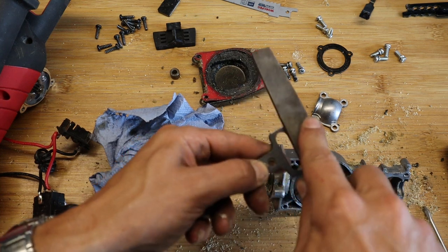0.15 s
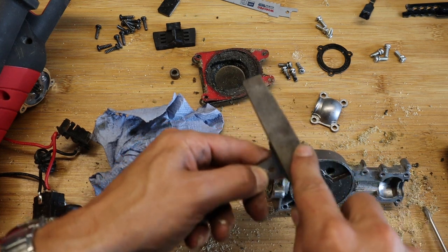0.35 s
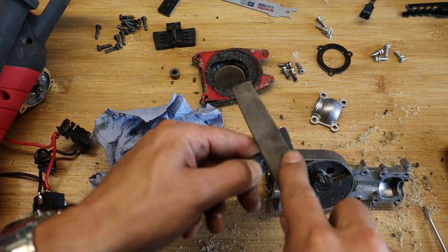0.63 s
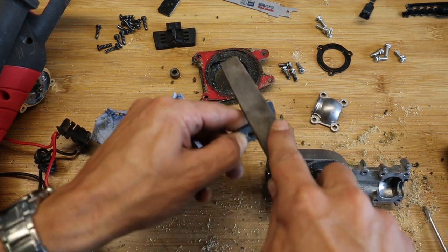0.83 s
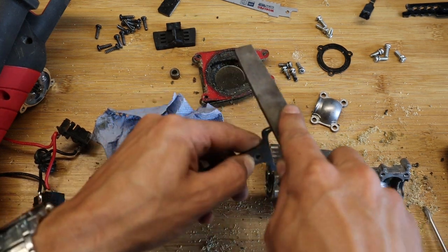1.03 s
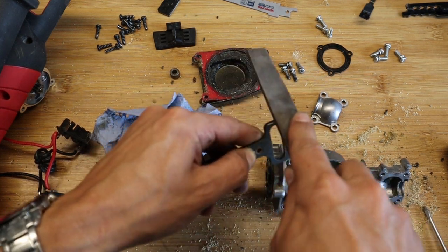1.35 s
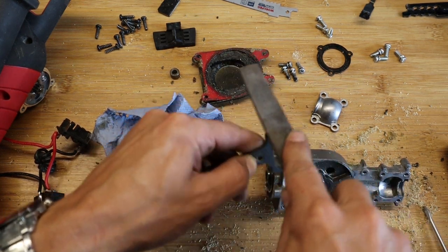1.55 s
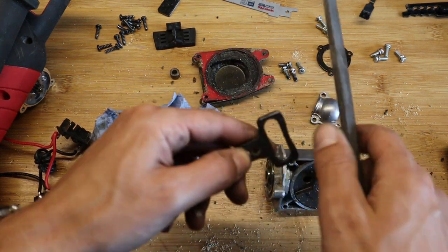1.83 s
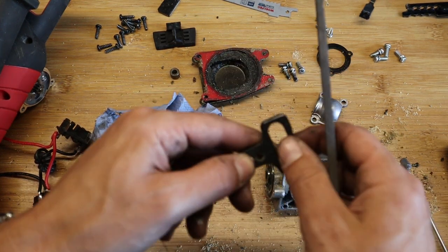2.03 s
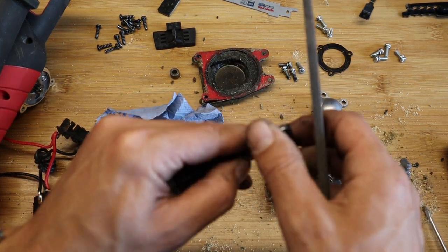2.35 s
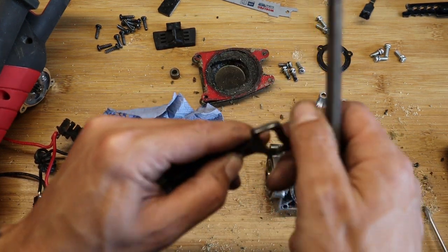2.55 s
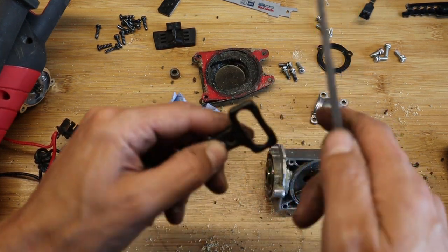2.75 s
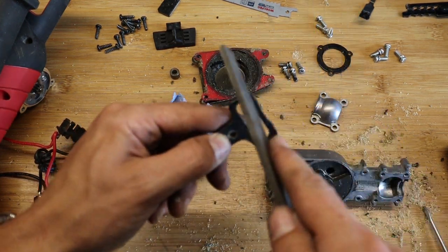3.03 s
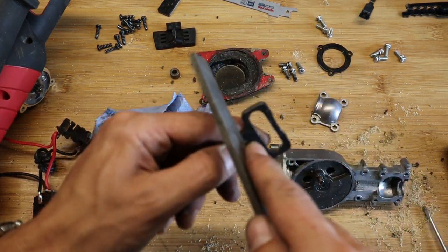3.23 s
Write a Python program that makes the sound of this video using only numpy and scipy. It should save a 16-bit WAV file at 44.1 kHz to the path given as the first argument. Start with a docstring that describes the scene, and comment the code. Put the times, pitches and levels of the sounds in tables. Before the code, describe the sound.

A hand file rasps in quick short strokes across a small part, then pauses.

```python
"""Filing at a workbench

A flat hand file is pushed and drawn back in quick strokes over a small part held above a wooden bench. Its
teeth catch at a rate that follows the hand's speed and tear off chips; these impulses excite the resonances of
file and part in a small room. The file clicks as it bites in at the start of some strokes, the part is turned
in the fingers, and the file is set down again with a light scrape."""
import sys
import numpy as np
from scipy import signal
from scipy.fft import rfft, irfft
from scipy.io import wavfile

SR = 44100
rng = np.random.default_rng(int(sys.argv[2]) if len(sys.argv) > 2 else 0)


def generate_wav(sig):
    """Save sig (samples, or channels by samples) to the path in sys.argv[1] as 16-bit PCM at SR."""
    pcm = np.round(np.clip(np.atleast_2d(sig).T, -1, 1) * 32767).astype(np.int16)
    wavfile.write(sys.argv[1], SR, pcm)


N = 149940
HZ = np.fft.rfftfreq(4096, 1 / SR)  # frequency axis of the gain curves


def amp(db):
    """Amplitude ratio of a level in decibels."""
    return 10 ** (np.asarray(db) / 20)


def unit(x):
    """Normalisation to an rms of 1."""
    return x / np.sqrt(np.mean(x ** 2) + 1e-20)


def read(points, hz):
    """Interpolation of a table on a logarithmic frequency axis."""
    f, value = np.transpose(points)
    return np.interp(np.log(hz + 1), np.log(f + 1), value)


def add(mix, start_s, sound):
    """Superposition of a sound on the mix."""
    at = round(start_s * SR)
    sound = sound[max(-at, 0):]
    part = mix[max(at, 0):][:len(sound)]
    part += sound[:len(part)]


def wander(count, hz):
    """Random fluctuation: low-passed noise with an rms near 1."""
    f = np.fft.rfftfreq(SR, 1 / SR)
    return unit(irfft(rfft(rng.standard_normal(SR)) / (1 + (f / hz) ** 2) ** 2))[:count]


def shelf(hz):
    """High-pass curve rising from 0 to 1 around hz."""
    return 1 / (1 + (hz / (HZ + 1)) ** 6)


def peak(hz, width):
    """Lorentzian resonance curve of height 1."""
    return 1 / (1 + (2 * (HZ - hz) / width) ** 2)


def colour(x, db, dispersion_s=.002):
    """Unit-energy filter of shape db, with dispersion: low bending waves arrive after high ones."""
    log_gain = np.log(amp(np.concatenate([db, db[-2:0:-1]])))
    minimum_phase = np.exp(np.conj(signal.hilbert(log_gain)))[:len(HZ)]
    group_delay = dispersion_s * (1 - np.sqrt(HZ / HZ[-1]))
    impulse = irfft(minimum_phase * np.exp(-2j * np.pi * np.cumsum(group_delay) * HZ[1]))
    return signal.fftconvolve(x, impulse / np.linalg.norm(impulse))


def room_tone(level_db=-56):
    """Stationary background noise: faint hiss and rumble."""
    # Each row: frequency in Hz, relative spectral density in dB.
    spectrum = [(20, -9), (50, -7), (120, -7.5), (300, -10), (650, -14), (1150, -7.5), (1500, -13.5),
                (1900, -18.5), (5000, -20.5), (16000, -24)]
    gain = amp(read(spectrum, np.fft.rfftfreq(N, 1 / SR)))
    return amp(level_db) * unit(irfft(rfft(rng.standard_normal(N)) * gain, N))


def room(x, early_db=-9, early_decay_s=.004019, tail_db=-14, tail_delay_s=.0093):
    """Early reflections off bench and hands, then reverberation that dies faster in the treble."""
    # Each row: frequency in Hz, time to decay by 60 dB in seconds.
    t60 = [(200, 0.42), (800, 0.4), (2100, 0.349), (5500, 0.361), (9000, 0.3255), (15000, 0.2366)]
    t = np.arange(SR // 2) / SR
    reflections = rng.choice([-1., 1.], len(t)) * (rng.random(len(t)) < 4000 / SR)
    early = reflections * (t > .0007) * np.exp(-t / early_decay_s)
    hz, age, bands = signal.stft(reflections * (t > tail_delay_s), SR, nperseg=256)
    tail = signal.istft(bands * amp(-60 * age / read(t60, hz)[:, None]), SR, nperseg=256)[1][:len(t)]
    echoes = amp(early_db) * early / np.linalg.norm(early) + amp(tail_db) * tail / np.linalg.norm(tail)
    return x + signal.fftconvolve(x, echoes)[:N]


def swell(length, db, tone_db):
    """Filtered noise under a half-sine envelope."""
    count = round(length * SR)
    envelope = np.sin(np.linspace(0, np.pi, count))
    return amp(db) * colour(rng.standard_normal(count) * envelope, tone_db)


def handling():
    """Structure-borne bumps of the hands on the bench, and friction noise of fingers on the part."""
    # Each row: start in seconds, length in seconds, level in dB, centre frequency in Hz.
    bumps = [(.36, 0.093, -50.5, 240), (.905, 0.027, -54.5, 169), (1.22, .24, -48.5, 152.1),
             (1.381, .08, -62, 90.17), (2.78, 0.0647, -54.5, 170.3), (2.83, 0.095, -59, 198.8)]
    # Each row: start in seconds, length in seconds, level in dB.
    rubs = [(0.909, 0.0169, -52), (2.552, 0.0488, -50.5), (2.585, .12, -55), (2.802, 0.019, -70.5)]
    # Each row: frequency in Hz, relative spectral density in dB.
    rub_tone = [(100, -31.5), (600, -2.5), (1500, -5.5), (3000, -10.5), (7000, -7), (16000, -20)]
    out = np.zeros(N)
    for start, length, db, hz in bumps:
        add(out, start, swell(length, db, 20 * np.log10(peak(hz, width=.66 * hz) + 1e-5)))
    for start, length, db in rubs:
        add(out, start, swell(length, db, read(rub_tone, HZ)))
    return out


def body_db():
    """The normal modes of file and part, summed in power into one gain curve in dB."""
    # Each row: frequency in Hz, bandwidth in Hz, relative strength in dB.
    modes = [(340, 35, 4.5), (594.1, 90, 8), (976, 71, 8), (1331, 140, 9.5), (1738.7, 180, 6),
             (2214, 50, 7), (2436.5, 160, 5), (2789.7, 35, 4.5), (3056, 88, 5), (4364, 63, 2),
             (3969, 160, 0.5), (4790, 130, 4), (6064, 82, 3.5), (6512, 140, 7), (8453, 290, 8.5)]
    return 10 * np.log10(1 + .6 * sum(amp(db) ** 2 * peak(hz, width) for hz, width, db in modes))


def taps(decay_s=.0024):
    """Impact excitation: the file knocks on the part, and a brief rattle rings their modes."""
    # Each row: start in seconds, level in dB, bass gain in dB.
    knocks = [(.7812, -15, -6.5), (0.788, -13, -4.5), (0.8149, -20, 3.5), (1.008, -16.5, -4.5),
              (1.1765, -25.5, -0.5), (1.374, -13, 1), (1.5055, -21, -6.5), (1.6518, -12, -6),
              (2.571, -49.5, 1), (3.1334, -16, 5), (3.136, -21.5, 4), (3.230, -26, 5.5), (3.2384, -19.5, 3)]
    # Each row: frequency in Hz, relative spectral density in dB.
    tone = [(100, -42.5), (200, -15.5), (350, -6), (700, -12), (1000, -5.5), (1250, -14.5), (1800, 0.5),
            (2500, -4), (4000, 3), (7500, -6), (9000, -9.5), (11000, -17), (16000, -21.5)]
    out, t = np.zeros(N), np.arange(0, .03, 1 / SR)
    for start, db, bass_db in knocks:
        rattle = rng.standard_normal(len(t)) * np.exp(-t / decay_s)
        shape_db = read(tone, HZ) + body_db() + bass_db * (1 - shelf(hz=2200))
        add(out, start, amp(db) * colour(rattle, shape_db))
    return out


def sliding(drive, arch, tooth_rate, place, whine_width=.1406, dull_hz=5300, node_hz=189.66):
    """A moving point of excitation: bands fade as the contact crosses the file's vibration nodes."""
    hz, times, bands = signal.stft(drive, SR, nperseg=512, noverlap=384)
    at, hz = np.minimum((times * SR).astype(int), len(drive) - 1), hz[:, None]
    ratio = hz / tooth_rate[at]
    # Energy gathers at the tooth rate and is thin below it.
    whine_db = 2.5 / (1 + ((ratio - 1) / whine_width) ** 2) - 2.5 / (1 + (ratio / .767) ** 6)
    dull_db = -4 * (1 - arch[at]) * hz ** 4 / (hz ** 4 + dull_hz ** 4)  # treble sinks as the file slows
    nodes_db = 2 * np.cos(2 * np.pi * (np.sqrt(hz / node_hz) * place[at] + rng.random()))
    bands = bands * amp(whine_db + dull_db + nodes_db)
    return signal.istft(bands, SR, nperseg=512, noverlap=384)[1][:len(drive)]


def stroke(tone, direction, length, crest, db, start_db, end_db, tooth_hz,
           bass_db, treble_db, fizz_db, low_hz, low_db, high_hz, high_db):
    """Forced vibration: teeth catch in turn and shed chips as the hand speeds up, presses and slows."""
    attack_s, release_s = .0015, .0027
    end_speed, tooth_jitter, chips_per_s = .45, .12, 5000
    t = np.arange(0, length + 6 * release_s, 1 / SR)
    n, knots = len(t), [0, crest * length, length]
    arch = np.sin(np.interp(t, knots, [0, np.pi / 2, np.pi]))
    tooth_rate = tooth_hz * (end_speed + (1 - end_speed) * arch)
    teeth_passed = np.cumsum(tooth_rate * (1 + tooth_jitter * wander(n, hz=695.04))) / SR
    teeth = np.diff(np.floor(teeth_passed), prepend=0) * amp(3.5 * np.clip(rng.standard_normal(n), -2, 2))
    chips = (rng.random(n) < chips_per_s / SR) * rng.choice([-1, 1], n)
    chips = chips * amp(2.5 * np.minimum(rng.exponential(1, n), 3))
    hiss = amp(-2.5) * rng.standard_normal(n)
    drive = unit(teeth - teeth.mean()) + amp(-2) * unit(chips) + hiss
    place = 1 + direction * .1 * (teeth_passed / teeth_passed[-1] - .5)  # relative contact position
    drive = unit(sliding(drive, arch, tooth_rate, place))
    chatter = unit(amp(2 * wander(n, hz=260)))
    pressure = amp(db + np.interp(t, knots, [start_db, 0, end_db])) * chatter
    contact = np.minimum(t / attack_s, 1) * np.exp(-np.maximum(t - length, 0) / release_s)
    tilt = bass_db * (1 - shelf(hz=890)) + treble_db * shelf(hz=5920) + fizz_db * shelf(hz=10170)
    grip = low_db * peak(low_hz, width=.42 * low_hz) + high_db * peak(high_hz, width=.21 * high_hz)
    return colour(drive * pressure * contact, read(tone, HZ) + body_db() + tilt + grip)


def filing():
    """Reciprocating abrasion: cutting and return strokes each have their own spectrum."""
    # Each row: start in seconds, length in seconds, pressure crest as a share of the length,
    # crest level in dB, start and end levels in dB relative to it, top tooth rate in Hz,
    # bass, treble and fizz gains in dB, low grip resonance in Hz, its lift in dB,
    # high grip resonance in Hz, its lift in dB.
    pushes = [ (.0865, .13, 0.625, -14.5, -2.5, -6, 926.8, 2, -0.5, 0.5, 5040, 4.5, 9880, 4.5),
              (.4425, 0.0988, 0.778, -12, -2.5, -7.5, 1095, -4, 0, -0.5, 1750, 0.5, 8740, 1.5),
              (1.009, 0.1288, 0.5095, -14, -6, -10, 849.3, 3, -0.5, -4.5, 2400, 2.5, 6440, 5.5),
              (1.373, .095, .75, -21, 5.5, -2, 640.5, 3, 3, -12.5, 1346, 2, 8860, 1),
              (1.651, .083, 0.641, -13, 2, -1, 950, -4, 0, -4, 1750, -1, 4670, 0.5)]
    pulls = [ (-.06, 0.09654, 0.5554, -14.5, 1, -11.5, 794.9, 4.5, 10, 5, 3120, 6.35, 4438, 7.7),
             (.2735, 0.11224, 0.4206, -16.5, -1.5, -4.5, 1000, 7, 8, -1.5, 2384, 3.45, 5700, 3.95),
             (.537, 0.026, .6, -23.5, -14, -11.5, 546.5, 8, 10.5, 1.5, 3500, 1.8, 5000, 1.52),
             (.598, 0.1277, .42, -18, -9, -4, 895.9, 2, 3.5, 2, 2500, 2, 6405, 2.04),
             (1.173, 0.1249, 0.606, -16.5, -10, -4.5, 651, -1.5, 2, -4.5, 2150, 4.86, 4700, 1),
             (1.504, .099, .5, -22, 0, -0.5, 649.4, -1.5, 1, -2, 2050, 8.2, 4315, 1.4),
             (3.14, 0.088, 0.82, -43, 5.5, 8.5, 399, 9.5, 1, 10.5, 1863, 9, 3773, 2),
             (3.2215, 0.0304, 0.462, -31.5, -4, 0.5, 400.4, 13.5, 7, 4.5, 1700, 2.1, 4160, 9.6)]
    # Each row: frequency in Hz, relative spectral density in dB.
    push_tone = [(100, -35.5), (300, -17.5), (550, -13.5), (1150, -13.5), (1600, -6), (2400, -2.5),
                 (3000, -0.5), (4800, 1), (7300, -3.5), (9300, 0), (10800, -11), (14000, -8),
                 (16000, -22.5)]
    pull_tone = [(100, -31), (300, -14.5), (550, -12), (1150, -4), (1600, -4), (2300, 2.5), (3000, 3),
                 (4500, 2.5), (7300, -4.5), (8500, -9.5), (9600, -6.5), (10800, -18), (14000, -22),
                 (16000, -25)]
    out = np.zeros(N)
    for strokes, tone, direction in (pushes, push_tone, 1), (pulls, pull_tone, -1):
        for start, *settings in strokes:
            add(out, start, stroke(tone, direction, *settings))
    return out


def scene():
    """Superposition of all sources in the workshop, in one channel."""
    return (room(filing() + taps() + handling()) + room_tone())[None]


def record(dry):
    """Soft saturation rounds the peaks above a knee; a low-pass filter limits the band."""
    knee, cutoff_hz = .7, 15900
    linear = np.clip(dry, -knee, knee)
    rounded = linear + (1 - knee) * np.tanh((dry - linear) / (1 - knee))
    lowpass = signal.firwin(401, cutoff_hz, window=("kaiser", 8), fs=SR)
    return signal.oaconvolve(rounded, lowpass[None], "same")


dry = scene()
out = record(dry)
generate_wav(out)
```